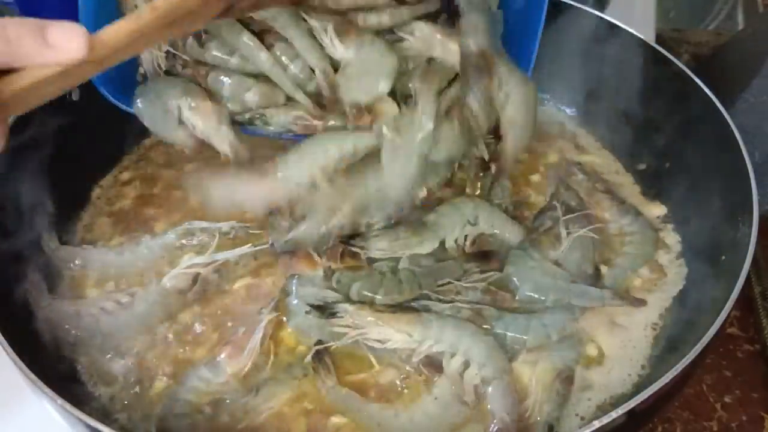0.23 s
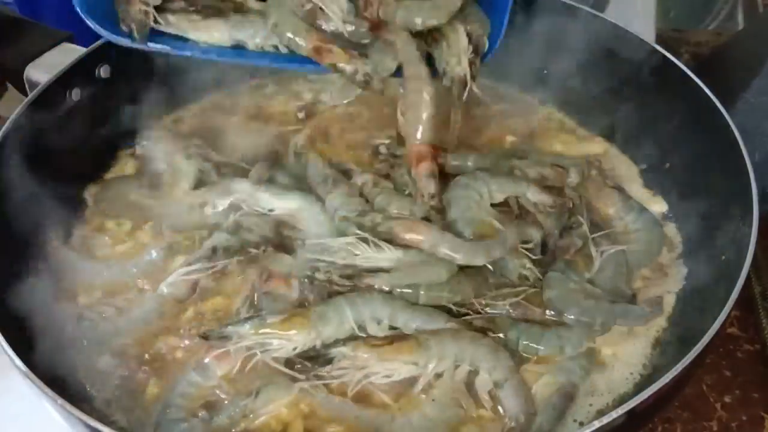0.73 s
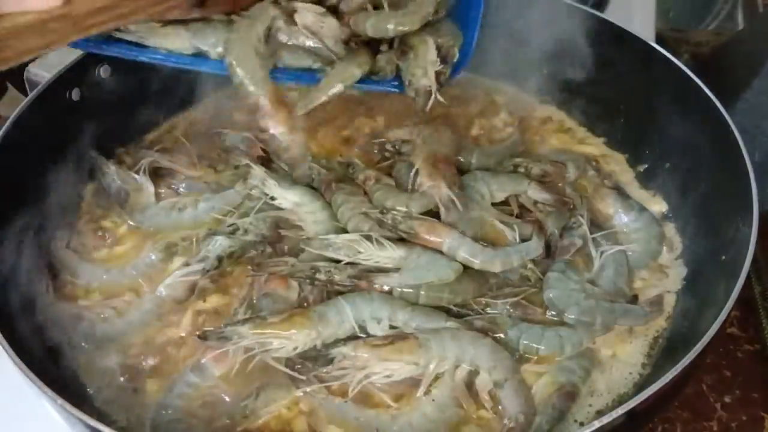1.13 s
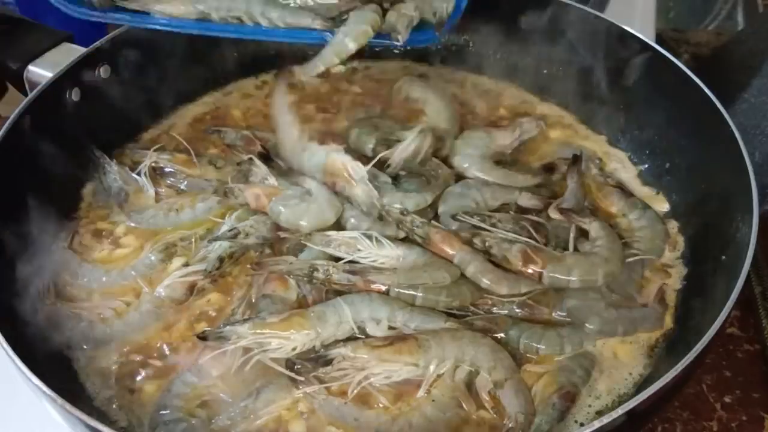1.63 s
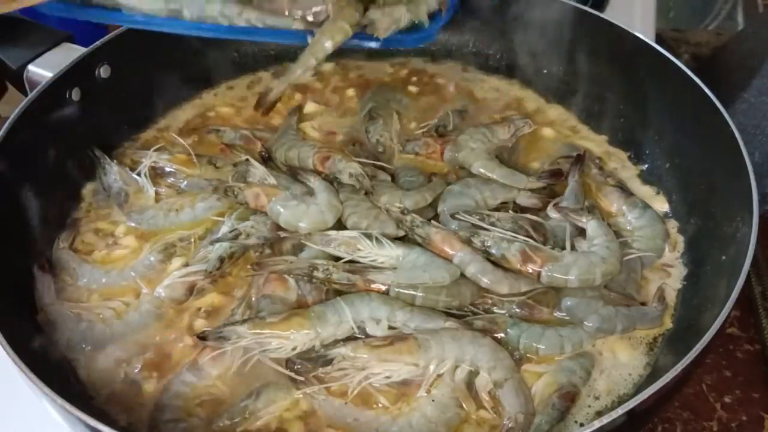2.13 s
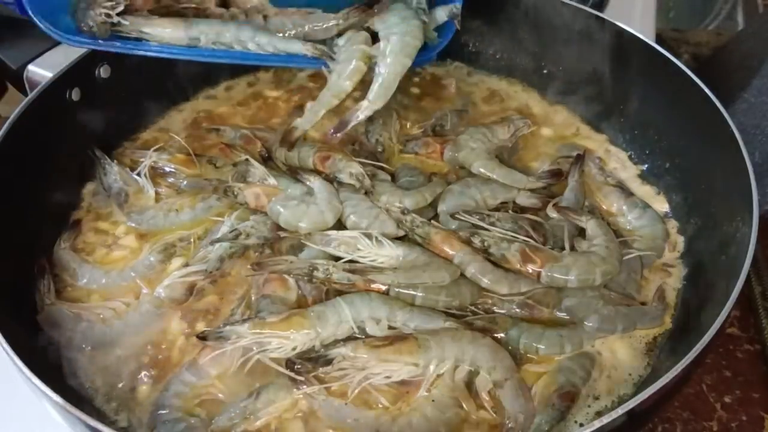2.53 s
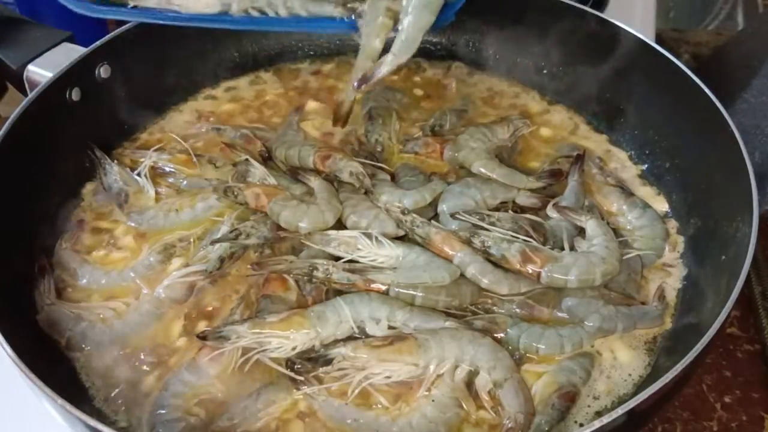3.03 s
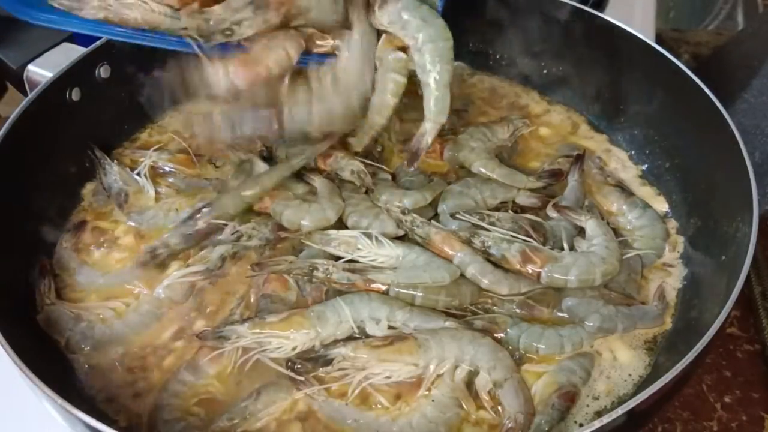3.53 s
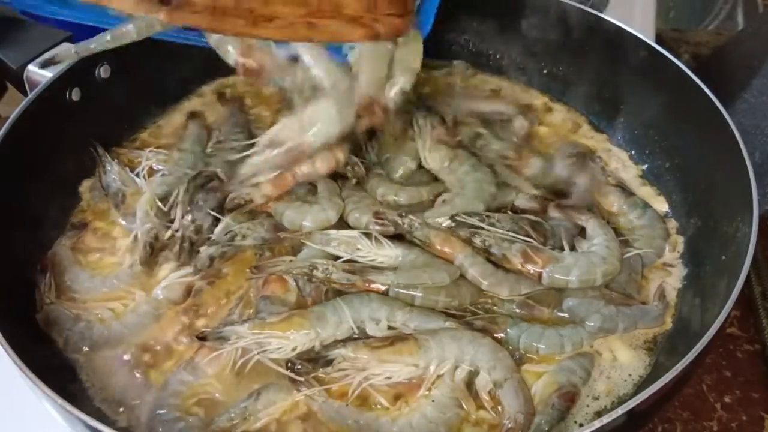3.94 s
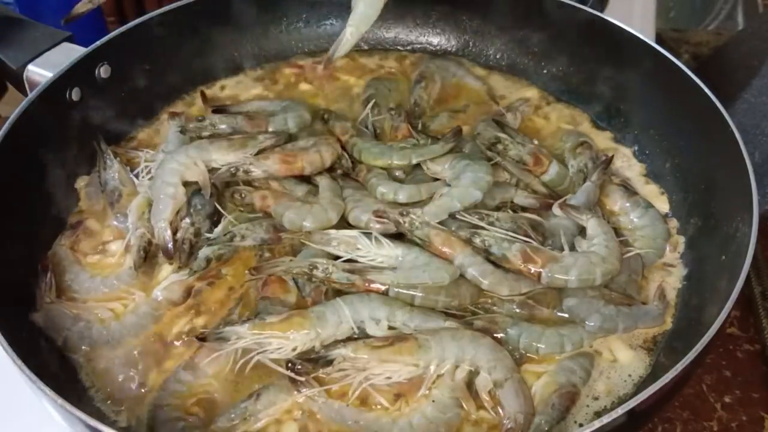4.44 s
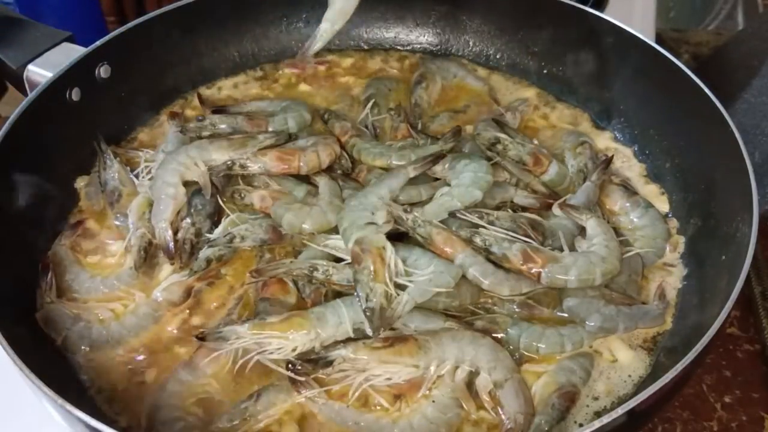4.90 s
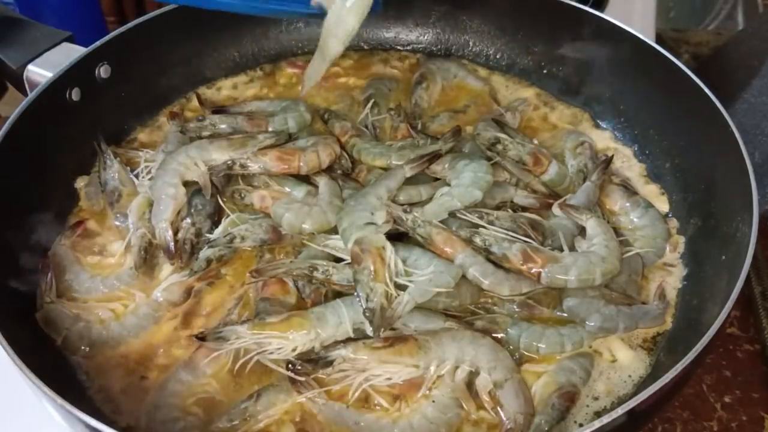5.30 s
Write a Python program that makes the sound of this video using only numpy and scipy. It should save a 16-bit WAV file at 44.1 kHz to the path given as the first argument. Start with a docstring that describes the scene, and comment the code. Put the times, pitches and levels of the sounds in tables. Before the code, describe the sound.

Close hollow raps of wood on plastic tip raw shrimp into quietly simmering sauce, ending in a quick cluster with a brief squeaky scrape before it.

```python
"""A wooden spatula knocks and scrapes a plastic tub close to the microphones, pushing shrimp out into a wok.
Blows and drags ring the tub's decaying modes; shells tick, shrimp land and fat spits as puffs of band noise.
Behind them wavering coloured noise makes the wok's sizzle and simmer, the burner's soft roar and low hum,
and the rumble of hands on the gear. The place is a small kitchen with a short, faint reverberation."""
import sys
import numpy as np
from scipy import signal
from scipy.fft import rfft, irfft, next_fast_len
from scipy.io import wavfile

SR = 44100
rng = np.random.default_rng(int(sys.argv[2]) if len(sys.argv) > 2 else 0)


def put_to_file(sound):
    """Save the sound as 16-bit audio at rate SR, in the file named by the first command-line argument."""
    columns = np.atleast_2d(sound).T  # one column per channel
    safe = np.clip(columns, -1, 1)
    whole_steps = np.round(safe * 32767)
    wavfile.write(sys.argv[1], SR, whole_steps.astype(np.int16))


N = 245237

# Reverberation time of the small kitchen: [f/Hz, t60/s]
KITCHEN_DECAY = [(150, 0.17), (500, 0.19), (1500, 0.24), (4000, 0.18), (10000, .12)]
# Left-right correlation of distant sound: [f/Hz, correlation]
FAR_LIKENESS = [(60, 0.6), (130, 1), (290, 0.34), (640, 0.053), (1400, 0), (4000, 0.)]
# Left-right correlation of a source near the microphones: [f/Hz, correlation]
NEAR_LIKENESS = [(800, 1), (1300, 0.41), (3000, 0.75)]
# Spells of hands on the gear, each a list of rumble levels: [t/s, level/dB]
HANDLING_SPELLS = [
    [(0.0, -69), (0.038, -60), (0.112, -89), (0.142, -105), (0.16, -108)],
    [(0.32, -97), (0.35, -108), (0.372, -76), (0.434, -65.5), (0.546, -70.5), (0.624, -100), (0.66, -94)],
    [(3.72, -95), (3.73, -105), (3.832, -74), (3.872, -60), (4.044, -70), (4.196, -55.5), (4.24, -72),
     (4.382, -69), (4.418, -62), (4.522, -76), (4.568, -66), (4.602, -61), (4.744, -108), (4.76, -90)],
    [(5.28, -97), (5.3, -104), (5.35, -75), (5.374, -69), (5.444, -90), (5.56, -72.5)],
]
# Relative colour of the handling rumble: [f/Hz, level/dB per Hz]
RUMBLE_COLOUR = [(12, -45.5), (20, -15.5), (45, 1.5), (59, 1), (86, -9.5), (124, -1.5), (160, -14.5),
                 (210, -44), (350, -120)]
# Burner levels: [t/s, roar level/dB, low hum level/dB]
BURNER_LEVELS = [(0.0, -68.5, -79), (0.77, -67.5, -75.5), (0.91, -69, -75), (1.44, -69, -78),
                 (1.81, -70, -74), (2.09, -72, -78), (2.38, -70, -74.5), (2.77, -69.5, -76),
                 (2.94, -63.5, -80), (3.17, -71, -77.5), (3.33, -69.5, -77), (3.73, -69.5, -77.5),
                 (3.89, -68.5, -74.5), (4.06, -71, -77), (4.44, -71, -74), (4.69, -72.5, -82),
                 (4.88, -72.5, -77.5), (5.1, -72.5, -78), (5.44, -72, -76.5), (5.56, -72.5, -71)]
# Relative colour of the burner's roar: [f/Hz, level/dB per Hz]
ROAR_COLOUR = [(240, -40), (400, -14.5), (430, -6), (582, -9), (652, -9.5), (1930, -0.5), (2800, -13.5),
               (3640, -32.5), (6160, -120)]
# Relative colour of the burner's low hum: [f/Hz, level/dB per Hz]
HUM_COLOUR = [(12, -51), (20, -24), (27, -23.5), (60, -12), (86, -24), (103, -3.5), (125, -5.5),
              (400, -19.5), (520, -54.5), (880, -120)]
# Wok levels: [t/s, sizzle level/dB, fine top sizzle level/dB, simmer level/dB]
WOK_LEVELS = [(0.0, -63, -58, -70.5), (0.32, -63, -60, -70.5), (0.65, -61.5, -58.5, -71.5),
              (1.04, -64, -62, -72.5), (1.19, -66.5, -64, -74.5), (1.76, -64, -62.5, -72),
              (1.86, -68, -67, -76), (1.98, -65.5, -62.5, -76.5), (2.11, -67.5, -72.5, -78.5),
              (2.45, -67, -67.5, -75.5), (2.6, -69, -76, -77), (2.79, -67, -73, -73.5),
              (2.93, -61.5, -61, -62.5), (3.02, -65, -69.5, -70.5), (3.25, -68, -73, -74.5),
              (3.39, -70.5, -78, -78.5), (3.65, -67.5, -70, -75.5), (3.78, -68, -75, -76.5),
              (4.09, -68.5, -71, -76), (4.3, -69.5, -79, -76), (4.55, -66, -73, -77.5),
              (4.81, -69, -70, -73.5), (4.89, -69.5, -73.5, -78), (5.03, -71, -72, -75.5),
              (5.28, -69.5, -87.5, -79.5), (5.56, -71.5, -77.5, -77)]
# Relative colour of the sizzle: [f/Hz, level/dB per Hz]
SIZZLE_COLOUR = [(4290, -50), (7300, -26.5), (7830, -5), (9050, -3.5), (9850, 5.5), (10800, -2.5),
                 (11200, -3.5), (14600, -36.5), (22000, -120)]
# Relative colour of the fine top sizzle: [f/Hz, level/dB per Hz]
TOP_COLOUR = [(6590, -32.5), (11200, -5), (12100, -0.5), (14400, -10), (15400, -12), (16000, -24.5)]
# Relative colour of the simmering sauce: [f/Hz, level/dB per Hz]
SIMMER_COLOUR = [(1650, -30), (2800, 2.5), (3210, -4.5), (3460, -0.5), (3740, -6.5), (4790, -4.5),
                 (7300, -7.5), (9490, -40.5), (16100, -120)]
# Shells ticking: [t/s, peak level/dB, f/Hz, t60/s, left over right/dB]
TICKS = [(0.238, -58.5, 3070, 0.1, -1.0), (0.5094, -58, 2070, 0.081, 5), (0.5342, -51, 2110, 0.13, 2.0),
         (0.5524, -50, 2520, 0.073, 3), (0.5688, -63, 2480, 0.078, -11), (0.738, -50.5, 6830, 0.16, -6),
         (1.12, -56.5, 3000, 0.12, -10), (1.2033, -54, 3400, 0.044, -3.5), (1.3411, -54, 4040, 0.11, -1.5),
         (1.4337, -52.5, 4200, 0.09, 2), (1.5627, -54, 2480, 0.09, -11.5), (1.5712, -53, 2290, 0.1, 13.5),
         (2.4004, -51.5, 4200, 0.03, 2), (3.0126, -54.5, 5110, 0.27, 4), (3.1894, -60, 3640, 0.27, 14),
         (3.5842, -53, 3720, 0.12, 4), (3.8243, -55.5, 5050, 0.16, 1), (3.9135, -59.5, 3970, 0.06, 2),
         (3.9739, -49, 1940, 0.11, -11), (3.9894, -54.5, 2020, 0.09, -1), (4.1114, -60, 5000, 0.18, 4),
         (4.542, -43, 4990, 0.09, 7.5)]
# Dull landings of shrimp, and a light knock on the tub at 1.003 s: [t/s, peak level/dB, f/Hz, t60/s, left over
# right/dB]
PLOPS = [(0.112, -67.5, 617, 0.15, -6), (0.469, -68, 514, 0.3, -14), (0.506, -60, 998, 0.12, -3),
         (0.533, -56, 935, 0.058, -16), (1.003, -47, 461, 0.047, 3), (1.019, -55.5, 422, 0.067, 1),
         (3.533, -62.5, 790, 0.17, -8.0), (4.038, -62.5, 642, 0.038, -4), (4.501, -66, 538, 0.16, 21),
         (4.53, -63, 655, 0.1, 17), (4.54, -57, 520, 0.1, 0)]
# Fat pops: [t/s, peak level/dB, f/Hz, t60/s, left over right/dB]
SPITS = [(1.41, -47, 10000, 0.022, 3.5), (1.456, -45, 12100, 0.0095, -3), (1.5618, -40.5, 11780, 0.06, -5),
         (1.7903, -38.5, 10300, 0.027, 0), (1.899, -41, 12100, 0.036, -12),
         (2.9247, -42.5, 10800, 0.036, -3.0), (3.474, -60, 10400, 0.023, -6),
         (3.512, -57.5, 10500, 0.023, 0), (4.2233, -56.5, 10100, 0.02, -6.5),
         (4.371, -57, 10200, 0.02, 2.5), (4.6813, -48.5, 10300, 0.0067, -2.5),
         (4.7825, -40, 11800, 0.043, -12.5), (4.862, -51, 10050, 0.017, -3.0),
         (4.8825, -48.5, 10440, 0.012, 2.5), (4.9207, -55, 12600, 0.028, -16),
         (5.254, -56, 9900, 0.011, -9), (5.3213, -52, 9900, 0.023, -3.0), (5.437, -56.5, 9850, 0.019, -4.0)]
# Modes of the tub when knocked: [f/Hz, relative level/dB, t60/s]
TUB_MODES = [(62, -9, 0.06), (125, -6.5, 0.068), (165.8, -9.5, .07), (209, -4.5, 0.18), (279, 6, 0.07),
             (316.7, -7, 0.05), (390, -11, 0.024), (520, -5, .03), (631, 2.5, .025), (732, -5.5, 0.06),
             (897, 4.5, 0.026), (992, -5.5, 0.021), (1386, 2, 0.012), (1764, 0.5, 0.019),
             (1956, 2.5, 0.019), (2340, 0, .012), (2630, -9, 0.0089), (3100, -4.5, 0.015),
             (3850, -5.5, 0.0057), (4600, -4, 0.0039), (5320, 8, 0.0051), (6600, -4.5, .005),
             (8000, -14.5, 0.0021), (10000, -5.5, .004), (12500, 1.5, 0.0036)]
# Drags of the spatula edge: [t/s, squeak level/dB, squeak f/Hz, hollow rub level/dB, dry rub level/dB]
SCRAPES = [
    [(4.49, -92, 580, -82, -90), (4.5, -69, 580, -56, -64.5), (4.524, -82, 605, -70, -68),
     (4.542, -69, 664, -50.5, -54), (4.6, -95, 544, -89, -93)],
    [(4.6, -91, 827, -81, -72), (4.614, -64, 881, -55, -72), (4.636, -29.5, 838.6, -56.5, -52),
     (4.656, -60, 872, -61, -53), (4.718, -72.5, 837, -77, -98), (4.75, -87.5, 900, -84, -83)],
]
# Frequencies at which the colour of each blow is given: [f/Hz]
KNOCK_BANDS_HZ = [80, 250, 600, 950, 1800, 3400, 8000]
# Blows on the tub: [t/s, level/dB, one strength/dB for each of KNOCK_BANDS_HZ, left over right/dB]
KNOCKS = [(0.048, -39.5, -19, -37, -27.5, -23, -13.5, -8.5, -34, 5.5),
          (0.935, -18.5, -47.5, -21.5, -14, -18.5, -15, -23, -49, 2),
          (1.884, -17, -62, -15.5, -30, -16.5, -17, -13, -22.5, 1),
          (2.759, -12.5, -38.5, -26, -14, -15, -18.5, -14, -35, 1),
          (2.915, -33.5, -60, -32, -5.5, -4, -25, -20, -42.5, 0),
          (4.994, -17.5, -54, -24, -18.5, -15, -16.5, -13, -31, 5),
          (5.004, -30.5, -43, -19, -6, -15.5, -1.5, -15, -22, 10),
          (5.042, -24, -35.5, -6.5, -15, -14.5, -10, -34, -50, 0),
          (5.064, -21, -29.5, -6.5, -17.5, -3.5, -13.5, -51, -54, 0),
          (5.223, -49.5, 10, -46, 10, -34, -20.5, -43, -19, 9)]

KITCHEN_SEND_DB, SIZZLE_PAN_DB = -37.5, -3.5
TAIL_DB, TAIL_T60_S = -17, 0.18   # diffuse noise tail of a blow, before the onset boost
RIGHT_LAG_S = .00008   # a blow reaches the right microphone this much later
STOPBAND_EDGE_HZ = 16300


def from_db(db):
    """Decibels to gain."""
    return 10 ** (np.asarray(db) / 20)


def rms_one(x):
    """Scale to rms 1."""
    return x / np.sqrt(np.mean(x ** 2) + 1e-20)


def in_time(rows, silent=False):
    """Columns of a curve, one value a sample; a silent curve is muted outside its span."""
    times, *columns = np.transpose(rows)
    edge = -140 if silent else None
    return [np.interp(np.arange(N) / SR, times, column, edge, edge) for column in columns]


def at_hz(points, hz):
    """Read a table on a log-frequency axis."""
    table = np.array(points)
    return np.interp(np.log(hz), np.log(table[:, 0]), table[:, 1])


def drift(rate_hz):
    """Slow random wander of spread 1: low-passed noise drawn every 40 samples."""
    step = 40
    r = np.exp(-2 * np.pi * rate_hz * step / SR)
    noise = rng.standard_normal(N // step + 2002)
    slow = signal.lfilter([1], [1, -2 * r, r * r], noise)[2000:]   # drop the filter's settling
    return np.interp(np.arange(N) / step, np.arange(len(slow)), rms_one(slow))


def ring(drive, hz, t60):
    """A damped resonator: a unit click sets a sine of height 1 ringing."""
    r = from_db(-60 / (t60 * SR))
    w = 2 * np.pi * hz / SR
    return signal.lfilter([0, np.sin(w)], [1, -2 * r * np.cos(w), r * r], drive + 1e-18)


def panned(x, pan_db):
    """Set left over right by pan_db."""
    return x * from_db(np.array([[.5], [-.5]]) * pan_db)


def spread(mid, side, alike):
    """Left and right of a given correlation from a shared and an opposed part."""
    alike = np.clip(alike, -1, 1)
    return np.sqrt(1 + alike) * mid + np.sqrt(1 - alike) * side * [[1], [-1]]


def noise_bed(colour, wander_db, grit_db=0.):
    """Distant stereo noise of a given colour; grit makes it grainy, its level wanders at random; rms 1."""
    size = next_fast_len(N, True)
    grit = from_db(grit_db * np.minimum(rng.exponential(1, (2, size)), 6))
    white = rng.standard_normal((2, size)) * grit
    hz = np.maximum(np.arange(size // 2 + 1) * SR / size, 1)
    mid, side = rfft(white) * from_db(at_hz(colour, hz))
    both = irfft(spread(mid, side, at_hz(FAR_LIKENESS, hz)), size)[:, :N]
    level_db = wander_db * (drift(6.0) + drift(26.3))
    return rms_one(both * from_db(level_db))


def kitchen(x):
    """A dense tail of reflections, each octave dying at its own rate; the bass is shared by both sides."""
    t, tail = np.arange(SR // 2) / SR, 0
    for hz in 60 * 2. ** np.arange(8):
        band = signal.butter(2, [hz / np.sqrt(2), hz * np.sqrt(2)], "band", fs=SR, output="sos")
        decay = from_db(-60 * t / max(at_hz(KITCHEN_DECAY, hz), .03))
        walls = rng.standard_normal((2, len(t))) * decay * (t > .003)   # reflections start after 3 ms
        tail = tail + spread(*signal.sosfilt(band, walls), at_hz(FAR_LIKENESS, hz))
    return signal.fftconvolve(x.mean(axis=0, keepdims=True), tail, axes=1)[:, :N]


def handling():
    """Hands on the gear: low noise that swells in separate spells."""
    gain = sum(from_db(in_time(spell, silent=True)[0]) for spell in HANDLING_SPELLS)
    return gain * noise_bed(RUMBLE_COLOUR, 0.86)


def burner():
    """The burner: a soft mid-band noise roar over a low noise hum."""
    roar_db, hum_db = in_time(BURNER_LEVELS)
    roar = from_db(roar_db) * noise_bed(ROAR_COLOUR, 0.93)
    hum = from_db(hum_db) * noise_bed(HUM_COLOUR, 0.822)
    return roar + hum


def wok():
    """The wok: two bands of grainy high sizzle, stronger at right, and a lower simmer."""
    sizzle_db, top_db, simmer_db = in_time(WOK_LEVELS)
    sizzle = from_db(sizzle_db) * noise_bed(SIZZLE_COLOUR, 0.623, grit_db=3.5)
    top = from_db(top_db) * noise_bed(TOP_COLOUR, .9, grit_db=2.0)
    simmer = from_db(simmer_db) * noise_bed(SIMMER_COLOUR, 1.5, grit_db=2.0)
    return panned(sizzle + top, SIZZLE_PAN_DB) + simmer


def bursts(rows, width, rise_s):
    """A puff of crackly noise that swells and dies, in a band about its pitch, which rings briefly."""
    out, t = np.zeros((2, N)), np.arange(int(.2 * SR)) / SR
    for s, peak_db, hz, t60, pan_db in rows:
        shape = (1 - np.exp(-t / rise_s)) * from_db(-60 * t / max(t60, .003))
        crackle = 0.2 + (rng.random(len(t)) < .02)   # wet crackle in a soft rush
        grains = rng.standard_normal((2, len(t))) * crackle
        puff = spread(*grains * shape, at_hz(NEAR_LIKENESS, hz))
        edges = np.clip([hz / width, hz * width], 50, .45 * SR)
        puff = signal.sosfilt(signal.butter(2, edges, "band", fs=SR, output="sos"), puff)
        core = ring(puff, hz, 36.0 / hz)   # the shell or bubble has a pitch of its own
        puff = puff / np.abs(puff).max() + 0.64 * core / np.abs(core).max()
        puff = from_db(peak_db) * puff / np.abs(puff).max()
        at = round(s * SR)
        out[:, at:at + len(t)] += panned(puff, pan_db)[:, :N - at]
    return out


def ticks_plops_and_spits():
    """Shells tick in a wide band, shrimp land in a narrow low one, fat pops high with a very fast rise."""
    ticks = bursts(TICKS, 1.37, rise_s=.002)
    plops = bursts(PLOPS, 1.09, rise_s=0.0013)
    spits = bursts(SPITS, 1.24, rise_s=0.00013)
    return ticks + plops + spits


def scrape(rows):
    """The edge sticks and slips at one wavering pitch, while rubbing noise rings the tub's modes."""
    span = slice(round(rows[0][0] * SR), round(rows[-1][0] * SR))
    squeak_db, squeak_hz, hollow_db, dry_db = [column[span] for column in in_time(rows)]
    squeak = np.sin(2 * np.pi * np.cumsum(squeak_hz) / SR) * from_db(2.0 * drift(63.0)[span])
    slips = rng.standard_normal((2, len(squeak)))
    hollow, dry_rub = 0, 0
    for hz, db, t60 in TUB_MODES[7:10]:   # rubbed, these modes ring longer than when knocked
        hollow = hollow + from_db(db) * rms_one(ring(slips[0], hz, 3.7 * t60))
    for hz, db, t60 in TUB_MODES[11:22]:
        dry_rub = dry_rub + from_db(db) * rms_one(ring(slips, hz, t60)) * (1000 / hz) ** 1.17
    out = np.zeros((2, N))
    out[:, span] += from_db(squeak_db) * rms_one(squeak)
    out[:, span] += from_db(hollow_db) * rms_one(hollow)
    out[:, span] += from_db(dry_db) * rms_one(dry_rub)
    return out


def tub_blow(colour, t):
    """A short uneven contact drives every tub mode by the blow's own colour; mid peak 1."""
    # the wood chatters before it leaves
    chatter = rng.standard_normal((2, len(t))) * np.exp(-t / .0018)
    contact = .5 * signal.sosfilt(signal.butter(1, 900, "high", fs=SR, output="sos"), chatter)
    contact[0, 0] = -1   # the first touch is a click
    blow = 0
    for k, (hz, db, t60) in enumerate(TUB_MODES):
        strength = (-1) ** k * from_db(db + at_hz(colour, hz))
        # high modes beam unevenly
        blow = blow + strength * spread(*ring(contact, hz, t60), at_hz(NEAR_LIKENESS, hz))
    return blow / np.abs(blow.mean(axis=0)).max()


def blow_tail(colour, t):
    """The diffuse tail of a blow: decaying noise of the blow's colour, tilted down in the treble."""
    hz = np.maximum(np.arange(len(t) // 2 + 1) * SR / len(t), 1)
    tilt = from_db(at_hz(colour, hz)) / hz ** 0.44 * (hz > 70)
    mid, side = rfft(rng.standard_normal((2, len(t)))) * tilt
    diffuse = rms_one(irfft(spread(mid, side, at_hz(NEAR_LIKENESS, hz))))
    onset_boost = 1 + 1.9 * np.exp(-t / 0.0015)
    return from_db(TAIL_DB - 60 * t / TAIL_T60_S) * onset_boost * diffuse


def knocks():
    """Each spatula blow, close to the microphones, rings the tub and trails a diffuse noise tail."""
    out, t = np.zeros((2, N)), np.arange(8192) / SR
    for s, level_db, *colour_db, pan_db in KNOCKS:
        colour = list(zip(KNOCK_BANDS_HZ, colour_db))
        blow = tub_blow(colour, t) + blow_tail(colour, t)
        # a small tub radiates little bass
        blow = signal.sosfilt(signal.butter(2, 110, "high", fs=SR, output="sos"), blow)
        blow = panned(from_db(level_db) * blow, pan_db)
        blow[1] = np.interp(t - RIGHT_LAG_S, t, blow[1], 0)   # the left microphone port is nearer
        at = round(s * SR)
        out[:, at:at + len(t)] += blow
    return out


def scene():
    """Near hits with their room, over the steady wok, burner and handling."""
    background = handling() + burner() + wok()
    hits = ticks_plops_and_spits() + sum(scrape(drag) for drag in SCRAPES) + knocks()
    return background + from_db(KITCHEN_SEND_DB) * kitchen(hits) + hits


def record(dry):
    """The microphones lose the deepest bass; the top is cut steeply."""
    dry = signal.sosfilt(signal.butter(2, 40, "high", fs=SR, output="sos"), dry)
    return signal.sosfilt(signal.cheby2(12, 70, STOPBAND_EDGE_HZ, fs=SR, output="sos"), dry)


dry = scene()
out = record(dry)
put_to_file(out)
```